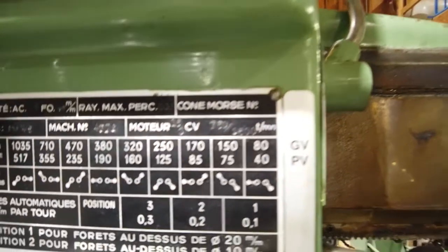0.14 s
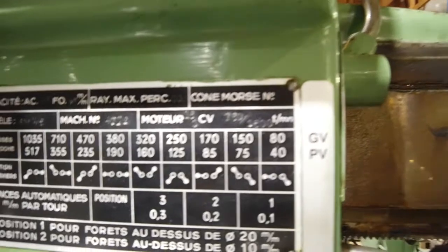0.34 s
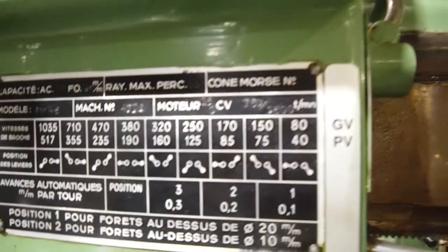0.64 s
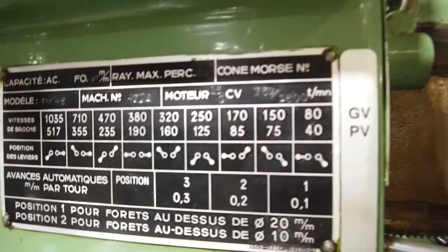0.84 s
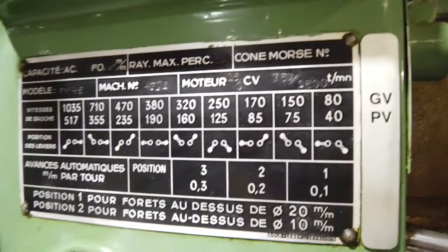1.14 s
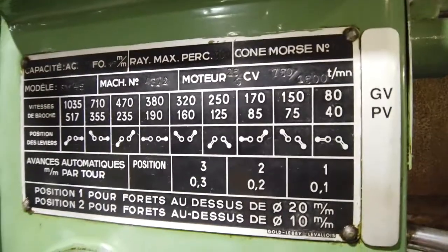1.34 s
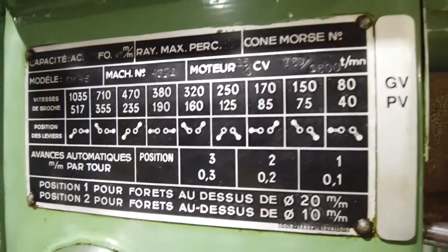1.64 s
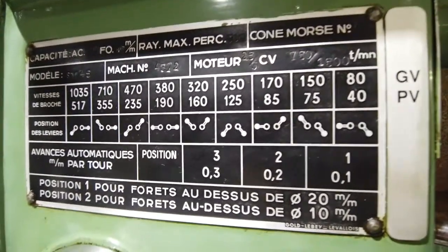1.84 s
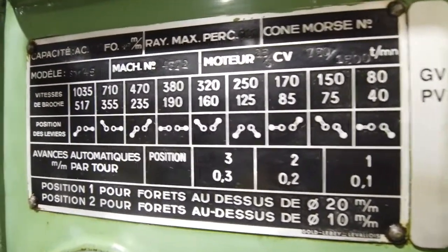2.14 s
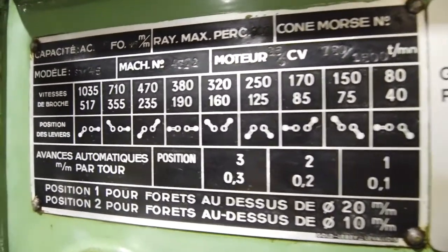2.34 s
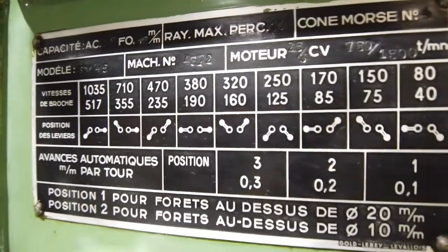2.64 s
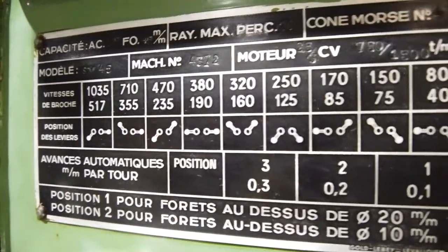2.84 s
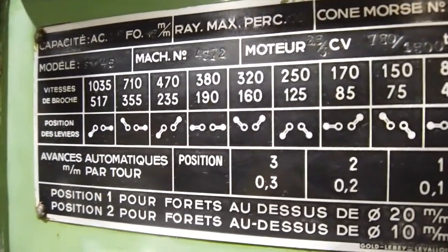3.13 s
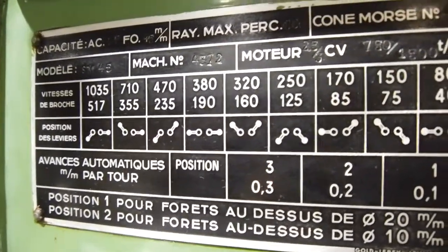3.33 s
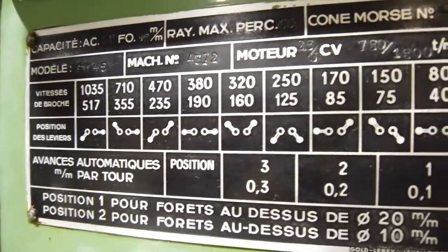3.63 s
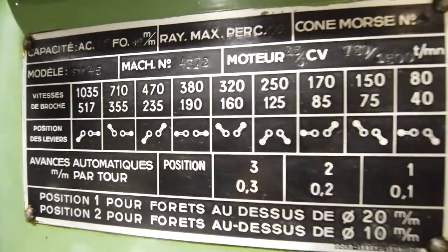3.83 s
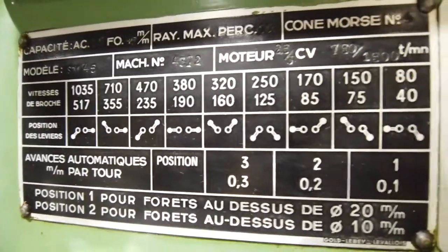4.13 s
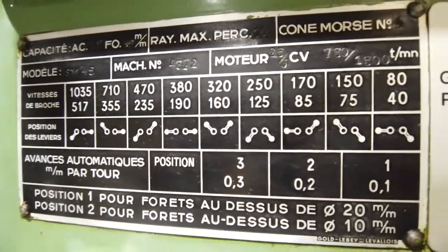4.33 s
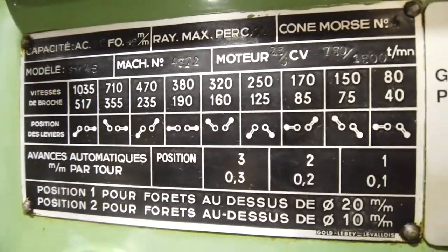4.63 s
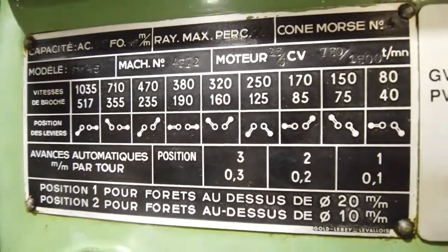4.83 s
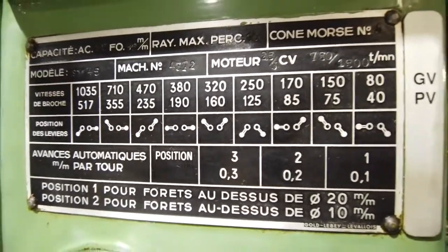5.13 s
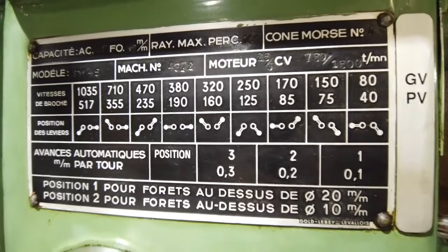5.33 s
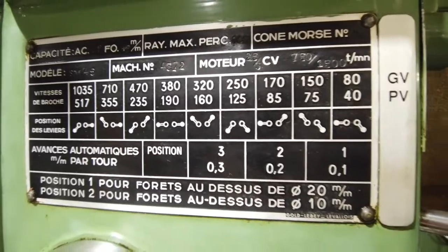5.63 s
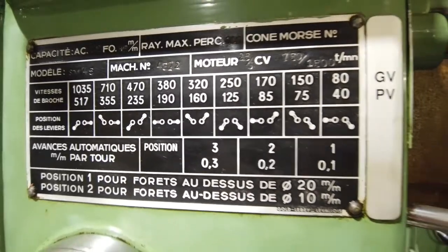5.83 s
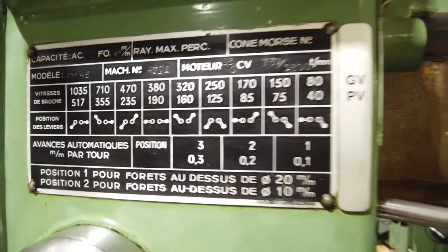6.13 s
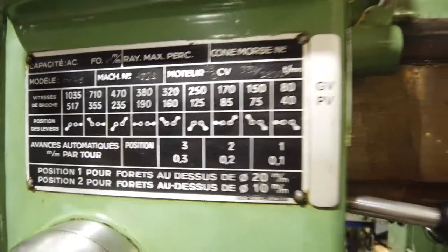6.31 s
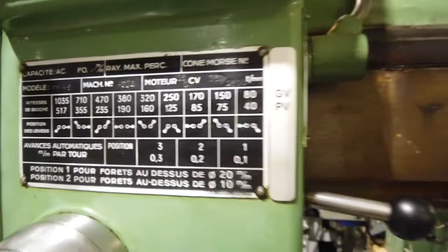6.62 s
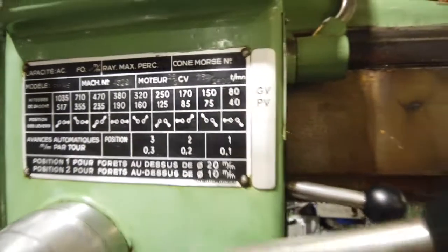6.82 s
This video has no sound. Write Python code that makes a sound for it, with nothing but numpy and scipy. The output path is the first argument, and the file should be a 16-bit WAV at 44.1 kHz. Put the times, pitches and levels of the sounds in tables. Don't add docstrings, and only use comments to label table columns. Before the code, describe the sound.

For about 7 seconds a large drill idles in a machine shop, already running at the start and still running at the end. A steady gear whine near 890 Hz dominates, with weaker harmonics and many faint shaft tones around it. Cast walls and a cover plate add a dense, grainy rattle, mainly 300 to 2700 Hz, with tiny irregular knocks. Thin bearing hiss and ringing around 4 to 11 kHz is brightest in the first 0.3 seconds; a very faint squeal near 7 kHz comes forward from 1 to 2.8. Beneath, a hum near 118 Hz throbs unevenly every 0.2 seconds or so, strongest around 2.1 and rising again near 4.65 and 6.6. The close stereo microphones shift the colour slightly; from about 6 seconds they draw back and the gearbox softens by several decibels, while the motor-end hiss rises a little.

```python
import sys
import numpy as np
from scipy import signal
from scipy.fft import rfft, irfft, next_fast_len
from scipy.io import wavfile
from scipy.ndimage import uniform_filter1d

SR = 44100
rng = np.random.default_rng(int(sys.argv[2]) if len(sys.argv) > 2 else 0)


def decibels_to_gain(level_db):
    exponent = np.asarray(level_db, float) / 20
    return 10 ** exponent


def transcribe(u):
    v = np.clip(np.atleast_2d(u).T, -1, 1)
    q = np.round(v * 32767).astype(np.int16)
    wavfile.write(sys.argv[1], SR, q)


N = 307377

MESH_HZ, PINION_TEETH, WHEEL_TEETH = 297.07, 24, 60

# (time [s], gearbox level [dB], motor-end level [dB], turn towards the upper wall [dB],
# turn towards the cover plate [dB])
MICROPHONE_PLACE = [(0.0, -29.0, -48.5, 1.0, -9.0), (0.3, -29.5, -49.5, 0.0, -7.5),
                    (0.7, -30, -49.5, 1, -9.5), (1.1, -29.5, -50.0, -2, -11.5),
                    (1.5, -30.5, -51.5, 1.0, -10), (1.9, -30.0, -52, 0, -11.5),
                    (2.35, -30, -50.5, -1, -11.0), (2.6, -30, -53.5, -1.0, -11.5),
                    (3.0, -31, -53, -1, -10.0), (3.4, -29.5, -53, -2.5, -10), (3.8, -30.5, -53, -2, -8),
                    (4.15, -31, -53.5, 2.5, -9.0), (4.6, -31, -54, -1.0, -11.5),
                    (5.1, -31, -54.5, -1.5, -10.5), (5.6, -31.5, -54.5, 0.0, -10),
                    (6.1, -32.5, -53.0, 0.5, -10), (6.5, -33, -52.5, -1, -10),
                    (6.97, -35.5, -51.0, 0, -8.0)]
# (frequency [Hz], side minus centre [dB])
SIDE_SHARE = [(40, -16.5), (110, -32), (220, -11), (450, -16), (800, -13.5), (1180, -18.5), (1350, -17.5),
              (2050, -17.5), (2400, -8), (2750, -9), (3000, 0.5), (4100, 7), (5500, 0), (12000, 0)]
# (frequency [Hz], likeness [0-1])
SIDE_LIKENESS = [(40, .3), (2500, .4), (3500, .75), (6000, .65), (8000, .35), (11000, .45)]
EMPTY_BAND_HZ = [40, 300, 700, 1000, 1900, 3400, 3650, 3800, 4150, 4500, 6100, 6300, 6700, 6900, 12000,
                 13200, 13800, 14400]
EMPTY_SHARE = [
    [0, 0, 0, 0, 0, 0, .25, .55, .55, .06, .02, .5, .5, .02, .07, .3, .85, .98],
    [.35, .1, .1, .32, .2, 0, 0, 0, 0, 0, 0, .5, .45, .01, .02, .25, .75, .98],
]

# (time [s], frequency [Hz], level [dB])
COLUMN_THROBS = [(0.37, 120.0, -41), (0.52, 113.7, -46), (0.69, 120.9, -46.5), (0.88, 113.0, -41.5),
                 (1.09, 113.0, -40), (1.3, 116.5, -40), (1.5, 114.0, -36.5), (1.68, 117.1, -38),
                 (1.9, 117.1, -35.5), (2.09, 119.0, -31.5), (2.23, 119.0, -34.0), (2.49, 115.0, -40.5),
                 (2.7, 116.0, -37.5), (2.88, 122.2, -43), (3.12, 118.1, -38), (3.23, 121.9, -37.5),
                 (3.43, 120.0, -43.5), (3.66, 120.4, -47), (4.07, 118.3, -43), (4.25, 115.8, -43),
                 (4.53, 114.3, -41.5), (4.65, 119.0, -35.5), (4.87, 119.5, -40), (5.2, 115.0, -41.5),
                 (5.45, 123.0, -38.5), (5.85, 123.0, -40), (6.2, 119.0, -36.5), (6.42, 117.5, -37.5),
                 (6.59, 117.0, -33.5), (6.84, 115.0, -39)]
# (frequency [Hz], level [dB per Hz])
COLUMN_RUMBLE = [(20, -4), (40, -7), (90, -9), (118, 4), (150, -7), (230, -11.5), (270, -14), (320, -53)]

# (frequency [Hz], level [dB per Hz])
ROLLING_HISS = [(3500, -35.5), (3800, -11), (4300, -3.5), (5000, -10), (6100, -10.5), (6500, -7.5),
                (6900, -4.5), (7500, -7), (9500, -5.5), (11200, -11), (13400, -9), (13800, -14),
                (14300, -38), (15000, -32)]
# (frequency [Hz], width [Hz], level [dB])
HISS_MODES = [(8600, 320, 5), (11200, 500, 4)]
# (frequency [Hz], level [dB per Hz])
RACE_RING = [(2880, -57.5), (4900, -9), (5040, -11), (5160, -8), (5330, -2), (5540, 4), (5740, -2.5),
             (6400, -15.5), (8320, -24.5), (14100, -120)]
# (frequency [Hz], level [dB per Hz])
NEAR_RACE = [(4900, -34), (5150, -9.5), (5330, 0.5), (5450, -6.5), (5700, -39.5)]
# (frequency [Hz], level [dB per Hz])
CAGE_SQUEAL = [(6500, -38), (6950, -12), (7240, 1), (7500, -10), (8000, -37)]

# (frequency [Hz], level [dB per Hz])
LOWER_WALL_COLOUR = [(250, -35), (300, -13), (400, -5.5), (450, -11), (495, -6.5), (520, -11.5),
                     (570, -9.5), (720, -1.5), (880, 1.5), (940, -4), (1100, -4.5), (1340, 3), (1560, -6.5),
                     (1900, -29.5)]
# (frequency [Hz], level [dB per Hz])
UPPER_WALL_COLOUR = [(940, -47.5), (1600, -8), (1900, 0), (2000, 2), (2100, 2), (2300, -7.5), (2400, -22.5),
                     (2700, -41)]
# (frequency [Hz], level [dB per Hz])
COVER_COLOUR = [(2000, -32.5), (2300, -4), (2420, -1.5), (2550, -1), (2720, -7), (3000, -7), (3250, -11),
                (3740, -21), (4200, -30), (5400, -58)]
# (frequency [Hz], width [Hz], level [dB])
CASTING_MODES = [(310.5, 9.2, 4), (1026, 77, 5), (1145, 16.4, 10), (2062, 50, 6), (2256, 83, 5),
                 (2460, 50, 7), (2142, 17, 4), (2836, 29, 5), (3204, 40, -1)]

# (multiple of the mesh rate [1], centre level [dB], side level [dB])
MESH_HARMONICS = [(1, -57, -73), (2, -45, -58), (4, -54, -59), (5, -51, -70), (6, -56, -74), (8, -59, -59),
                  (9, -65, -66), (10, -56, -58)]
# (frequency [Hz], level [dB])
SHAFT_ORDERS = [(48.2, -62), (70.9, -53), (100.0, -62), (177.2, -62), (228.0, -65), (241.0, -63),
                (311.9, -50), (353.4, -60), (404.4, -57), (430.2, -58), (444.6, -62), (458.0, -62),
                (480.2, -59), (500.1, -60), (539.8, -51), (599.1, -59), (609.0, -58), (623.8, -52),
                (690.3, -54), (725.7, -51), (782.3, -52), (841.6, -49), (866.5, -50), (896.2, -49),
                (977.8, -55), (1225.8, -48), (1320.3, -49), (1619.6, -56)]


def evened(x):
    return x / np.sqrt(np.mean(x ** 2) + 1e-20)


def curve(rows):
    s, *columns = np.transpose(rows)
    return [np.interp(np.arange(N) / SR, s, c) for c in columns]


def read(points, hz):
    f, value = np.transpose(points)
    return np.interp(np.log(hz + 1), np.log(f + 1), value, left=-100, right=-100)


def drift(hz):
    steps = rng.standard_normal(int(N / SR * hz * 2) + 3)
    smooth = signal.resample(steps, 4096)
    return np.interp(np.linspace(0, len(smooth) - 1, N), np.arange(len(smooth)), evened(smooth))


def microphone_place():
    return [c - c.mean() for c in curve(MICROPHONE_PLACE)]


def small_modes(lo_hz, hi_hz, width_hz, db, count):
    places, strengths = rng.random((count, 2)).T
    return [(lo_hz + p * (hi_hz - lo_hz), width_hz, db * s) for p, s in zip(places, strengths)]


def coloured(pair, points, modes=()):
    size = 1 << 14
    hz = np.abs(np.fft.fftfreq(size, 1 / SR))
    db = np.maximum(read(points, hz), -100)
    for mode_hz, width_hz, mode_db in modes:
        db = db + mode_db / (1 + (2 * (hz - mode_hz) / width_hz) ** 2)
    minimum_phase = np.exp(np.conj(signal.hilbert(np.log(decibels_to_gain(db)))))
    taps = np.fft.ifft(minimum_phase).real[:size // 2]
    out = signal.oaconvolve(pair, taps[None], axes=1)[:, :N]
    return out / np.sqrt(np.mean(out[0] ** 2))


def tone(hz, db, side_db, waver_db):
    turn = 2 * np.pi * (np.cumsum(hz * np.ones(N)) / SR + rng.random())
    waver = decibels_to_gain(waver_db * drift(4))
    return np.sqrt(2) * waver * np.array([decibels_to_gain(db) * np.sin(turn), decibels_to_gain(side_db) * np.cos(turn)])


def worn(teeth):
    period = teeth * SR / MESH_HZ
    surface = rng.standard_normal((2, int(period) + 2))
    return surface[:, (np.arange(N) % period).astype(int)]


def spaced(force):
    size = next_fast_len(N)
    hz = np.clip(np.fft.rfftfreq(size, 1 / SR), 42, 10900)
    alike = np.clip(read(SIDE_LIKENESS, hz), 0, 1)
    centre, other = rfft(force, size)
    side = 1j * alike * centre + np.sqrt(1 - alike ** 2) * other
    return np.array([force[0], irfft(decibels_to_gain(read(SIDE_SHARE, hz)) * side, size)[:N]])


def contact(pair, wheel, pinion, knock_db, knocks_hz, throb_db):
    shares = np.clip([pair, wheel, pinion], 0, .3)
    force = np.sqrt(1 - shares.sum()) * rng.standard_normal((2, N))
    for share, teeth in zip(shares, (2 * WHEEL_TEETH, WHEEL_TEETH, PINION_TEETH)):
        force += np.sqrt(share) * worn(teeth)
    force = spaced(force)
    hits = (rng.random(N) < knocks_hz / SR) * np.minimum(rng.exponential(1, N), 2)
    decay_s = 0.0012
    knocks = signal.lfilter([1], [1, -np.exp(-1 / (decay_s * SR))], hits)
    throb = decibels_to_gain(throb_db * (drift(16) + 1.2 * drift(45)))
    return force * (1 + decibels_to_gain(knock_db) * knocks) * throb


def shop(pair, slow_db, quick_db):
    hz, t, z = signal.stft(pair, SR, nperseg=1024)
    slow, quick = rng.standard_normal((2, len(t), len(hz))).transpose(0, 2, 1)
    slow = uniform_filter1d(slow, size=5, axis=0)
    slow = uniform_filter1d(uniform_filter1d(slow, size=40, axis=1), size=40, axis=1)
    quick = uniform_filter1d(uniform_filter1d(quick, size=10, axis=0), size=6, axis=1)
    swell = decibels_to_gain(slow_db * evened(slow) + quick_db * evened(quick))
    return signal.istft(z * swell, SR, nperseg=1024)[1][:, :N]


def column():
    t = np.arange(N) / SR
    throb_s, fade_db_per_s = 0.052, 0.5
    beats = np.zeros(N)
    for k, (s, _, db) in enumerate(COLUMN_THROBS):
        beats += (-1) ** k * decibels_to_gain(db) * np.exp(-.5 * ((t - s) / throb_s) ** 2)
    boom = beats * tone(curve(COLUMN_THROBS)[0], -0.41, -33, .3)
    drone = decibels_to_gain(-fade_db_per_s * t) * tone(113.6, -50.5, -78.5, 1.7)
    rumble = decibels_to_gain(-47.5) * coloured(contact(0.24, 0.11, 0.08, -20, 30, 0.52), COLUMN_RUMBLE)
    return boom + drone + rumble


def bearings():
    near_db, t = microphone_place()[1], np.arange(N) / SR
    motor_turn = decibels_to_gain(0.97 * np.cos(2 * np.pi * MESH_HZ / PINION_TEETH * t + 0.74))

    opening_db, opening_s = 2.5, .3
    facing = decibels_to_gain(.7 * drift(9) + opening_db * np.exp(-(t / opening_s) ** 2))
    hiss_force = contact(0.32, 0.017, 0.022, -5.5, 60, 0.74) * motor_turn
    hiss = coloured(hiss_force, ROLLING_HISS, HISS_MODES) * facing

    force = contact(0.17, 0.027, 0.031, -7.0, 60, 1.0) * motor_turn
    ring = coloured(force, RACE_RING, small_modes(5000, 6200, 24, 4.8, count=20)) * decibels_to_gain(0.34 * drift(2.7))
    ring += decibels_to_gain(-8 + 2 * near_db - .5 * t) * coloured(force[:, ::-1], NEAR_RACE)

    from_s, to_s, edge_s = 1, 2.8, .15
    squeal = (np.tanh((t - from_s) / edge_s) - np.tanh((t - to_s) / edge_s)) / 2
    cage = decibels_to_gain(-65 + 6 * squeal + 0.53 * near_db) * coloured(force, CAGE_SQUEAL)
    return decibels_to_gain(-55.5 + .7 * near_db) * hiss + decibels_to_gain(-55 + 1.24 * near_db) * ring + cage


def housing():
    near_db, _, upper_db, cover_db = microphone_place()
    rattle_db = -31.5 + near_db
    force = contact(.15, .09, .03, -3.5, 130, .35)
    modes = CASTING_MODES + small_modes(1600, 3700, 11, 4.0, count=70)
    lower = coloured(force, LOWER_WALL_COLOUR, CASTING_MODES)
    upper = coloured(force * decibels_to_gain(1.18 * drift(26)), UPPER_WALL_COLOUR, modes)
    cover = coloured(force * decibels_to_gain(0.66 * np.roll(drift(5), SR)), COVER_COLOUR, modes)
    out = decibels_to_gain(rattle_db + 0.5) * lower
    out += decibels_to_gain(rattle_db + 0.1 + upper_db) * upper
    return out + decibels_to_gain(rattle_db - 9.5 + 1.35 * cover_db) * cover


def gears():
    near_db = 0.89 * microphone_place()[0]
    whine_db = -30 + near_db
    out = tone(3 * MESH_HZ, whine_db + 0.5, whine_db - 36, 0.1)
    for k, db, side_db in MESH_HARMONICS:
        out += tone(k * MESH_HZ, db + 0.5 + near_db, side_db - 2.5, 0.94)

    beat_hz, beat_db, beat_top_s = 312.46, -55, .45
    below_hz = min(SHAFT_ORDERS, key=lambda row: abs(row[0] - beat_hz))[0]
    beat = np.cos(2 * np.pi * (beat_hz - below_hz) * (np.arange(N) / SR - beat_top_s))
    for hz, db in SHAFT_ORDERS:
        beats = hz == below_hz
        swell = 1 + beats * decibels_to_gain(beat_db - db) * beat
        out += swell * tone(hz, db - 0.5 + 0.5 * near_db, db - 26.5, 1.9 * (not beats))
    return out


def scene():
    centre, side = column() + shop(bearings(), 0.82, 1.1) + shop(housing(), 1.2, .4) + gears()
    return np.array([centre + side, centre - side])


def thinned(dry):
    lead = 372
    mid_side = np.array([dry[0] + dry[1], dry[0] - dry[1]]) / 2
    mid_side = np.pad(mid_side, ((0, 0), (lead, 0)))
    hz, t, z = signal.stft(mid_side, SR, "cosine", nperseg=2048, noverlap=1024)
    power = (abs(z[:, :1024].reshape(2, 128, 8, -1)) ** 2).mean(2)
    power = uniform_filter1d(uniform_filter1d(power, size=2, axis=2), size=2, axis=1)
    masker = uniform_filter1d(power[0], size=15, axis=0, origin=4)
    chance = rng.standard_normal(power.shape)
    chance = uniform_filter1d(uniform_filter1d(chance, size=5, axis=1), size=2, axis=2)
    budget = decibels_to_gain(3.2 * evened(chance))
    rank = (budget * power / abs(masker + 1e-20)).argsort(2).argsort(2) / len(t)
    share = np.array([np.interp(hz[4:1024:8], EMPTY_BAND_HZ, s) for s in EMPTY_SHARE])
    z[:, :1024] *= np.repeat(rank >= share[..., None], 8, axis=1)
    faint = abs(z) ** 2 < .45 * uniform_filter1d(abs(z) ** 2, size=24, axis=1)
    z[faint & (hz[:, None] > 3400)] = 0
    restored = signal.istft(z, SR, "cosine", nperseg=2048, noverlap=1024)[1]
    centre, side = restored[:, lead:lead + N]
    return np.array([centre + side, centre - side])


def low_pass(x):
    return signal.sosfilt(signal.butter(12, 15000, fs=SR, output="sos"), x)


def record(dry):
    mix = thinned(dry)
    return low_pass(mix)


dry = scene()
out = record(dry)
transcribe(out)
```